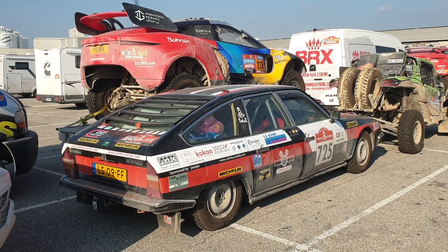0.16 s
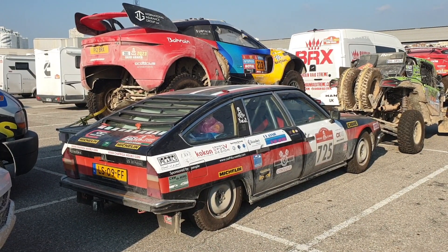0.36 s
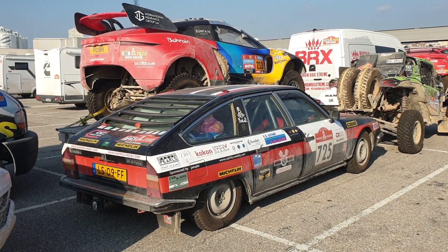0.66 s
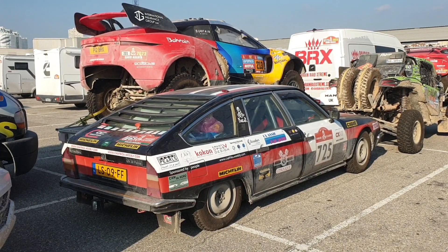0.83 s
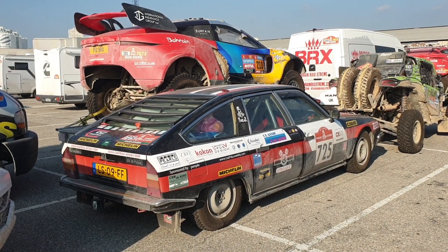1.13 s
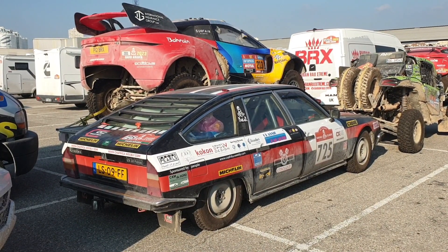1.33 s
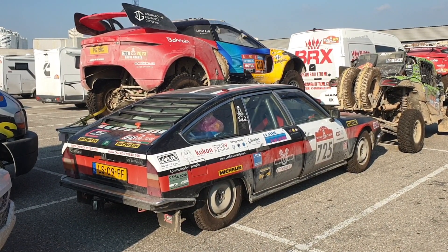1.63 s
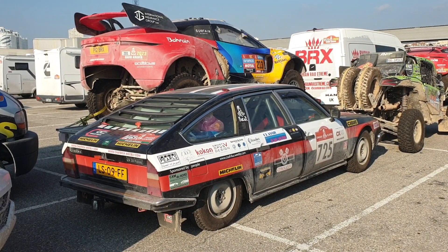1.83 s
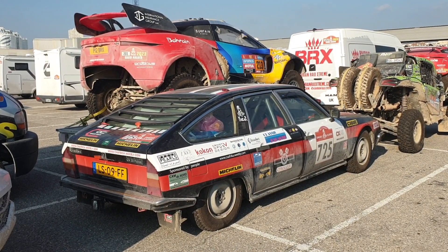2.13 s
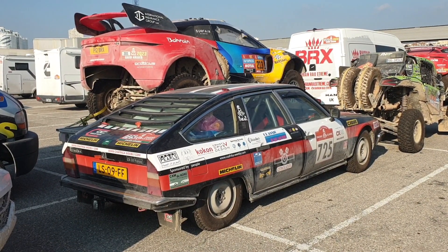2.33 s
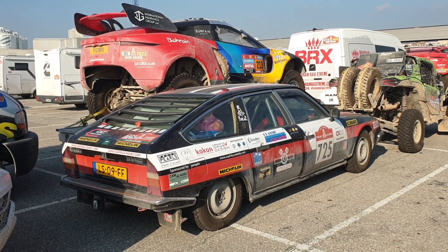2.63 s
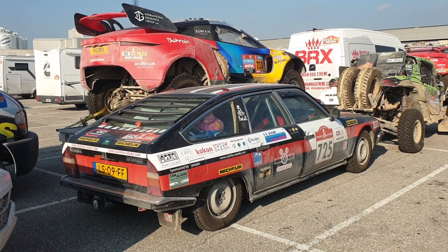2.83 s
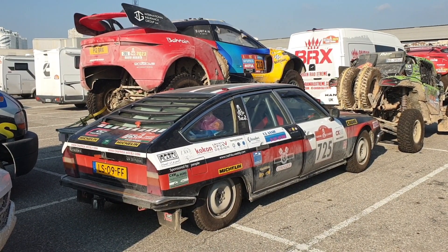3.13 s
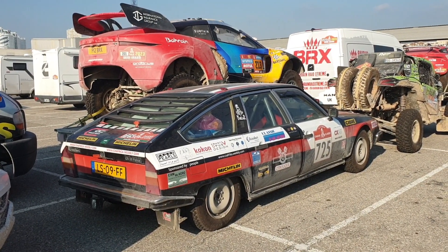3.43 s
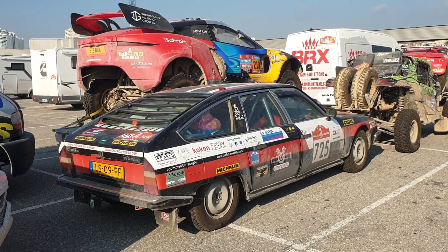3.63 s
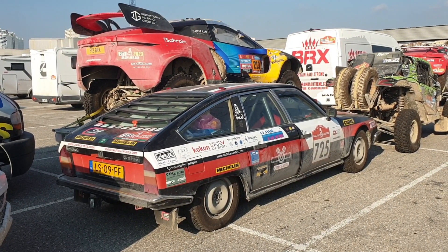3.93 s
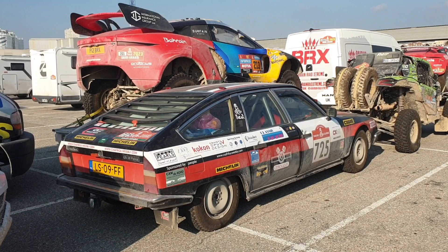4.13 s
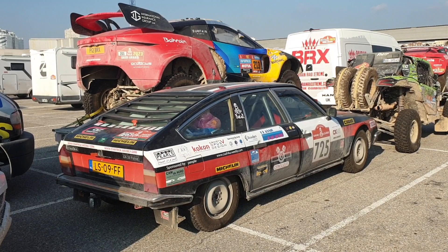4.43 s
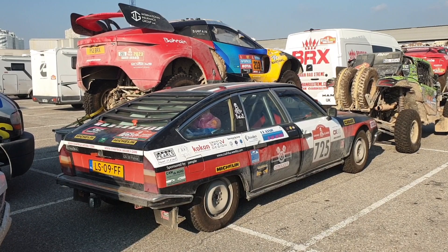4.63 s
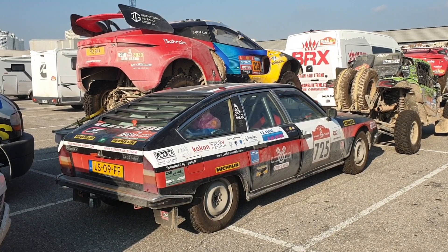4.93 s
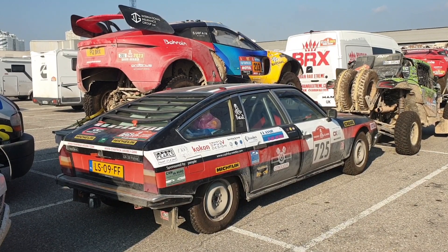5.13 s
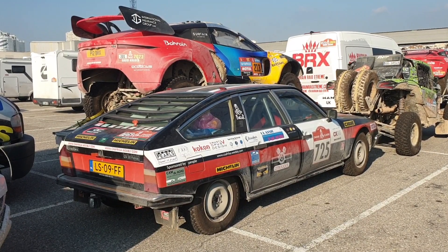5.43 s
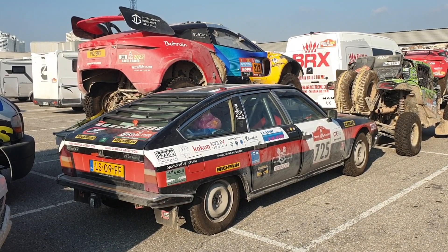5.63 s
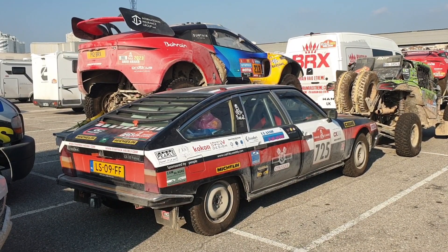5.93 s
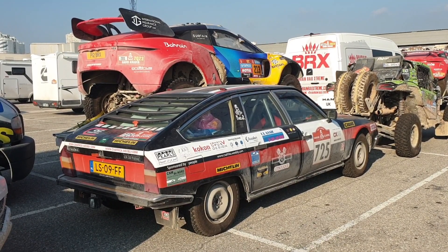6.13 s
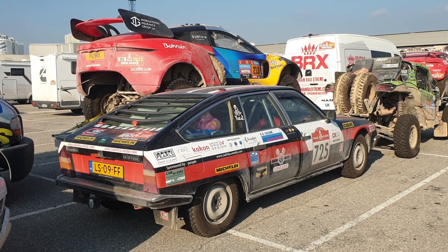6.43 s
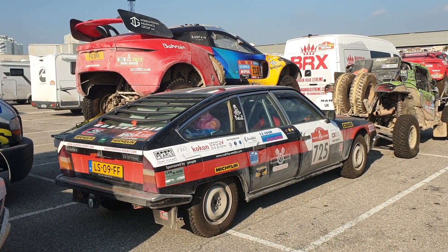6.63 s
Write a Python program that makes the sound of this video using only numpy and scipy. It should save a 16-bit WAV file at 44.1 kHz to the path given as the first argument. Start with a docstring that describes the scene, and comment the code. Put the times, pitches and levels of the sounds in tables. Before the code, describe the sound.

An old four-cylinder car idles unevenly close by with a boomy chug, is blipped once with rasp and pops, then settles lower in an open car park.

```python
"""An old four-cylinder rally car idles close by in an open car park, chugging: one cylinder hardly fires.
It first idles fast while a loose part clinks, then sags; a single blip adds rasp and pops, and it settles
as air whistles past the shut throttle. Near the end come squeaks, a steady hiss from the right and a knock.
Throughout, exhaust pulses ring pipe resonances, shaped noise bursts make the gas, impacts make the valve
clatter, and engine orders excite a housing as whine, over faint yard noise."""
import sys
import numpy as np
from scipy import signal
from scipy.fft import rfft, irfft, next_fast_len
from scipy.io import wavfile
from scipy.ndimage import uniform_filter1d

SR = 44100
rng = np.random.default_rng(int(sys.argv[2]) if len(sys.argv) > 2 else 0)


def master(y):
    """Save y as 16-bit WAV."""
    cut = np.clip(np.atleast_2d(y).T, -1, 1)
    pcm = np.round(cut * 32767)  # scale
    wavfile.write(sys.argv[1], SR, pcm.astype(np.int16))


N = 298998
TIME = np.arange(N) / SR

# yard background and low rumble spectra: pitch_hz, density_db
YARD_SPECTRUM = [(350, -3), (800, -11), (1500, -5.5), (2400, -10), (3500, -3.5), (6300, -22.5), (7700, -46),
                 (15500, -22)]
RUMBLE_SPECTRUM = [(24, -2), (40, -1.5), (90, -17), (400, -52.5), (2000, -88)]
RUMBLE_DB = -54.5
# late hiss spectrum: pitch_hz, density_db
HISS_SPECTRUM = [(700, 8), (1500, 6.5), (2400, -12), (3600, 2.5), (5000, 1.5), (6400, 1), (7100, -7),
                 (7700, -22), (10000, -15.5), (12500, -9.5), (15500, -17)]
HISS_START_S, HISS_ATTACK_S, HISS_BEFORE_PAN_DB = 5.985, 0.004, -57
HISS_FLUTTER_DB, HISS_FLUTTER_PER_S = 1.8, 14
TOP_HZ = 15750  # upper limit of the sound
# interchannel phase of the bass, positive where the left leads: pitch_hz, lead_rad
BASS_PHASE = [(30, -.24), (70, -.24), (130, -.33), (300, -.35)]

# engine speed: time_s, firing_rate_hz
ENGINE_SPEED = [(0.0, 77.75), (0.15, 74.88), (0.624, 77.01), (1.047, 75.17), (1.569, 76.16), (2.123, 66.78),
                (2.901, 64.05), (3.158, 66.22), (3.481, 79.49), (3.648, 80.09), (4.147, 66.95),
                (5.277, 61.01), (5.822, 62.87), (6.333, 59.87), (6.78, 61.45)]
# engine level, which peaks in the blip, falls away and grows near the end as the car sounds closer:
# time_s, above_idle_db
ENGINE_LEVEL = [(0, 1), (0.6, 2), (1, 3), (1.7, 1.0), (1.88, 1.9), (2.15, 1), (2.5, 2), (2.9, 0.8),
                (3.1, 2), (3.27, 4.5), (3.42, 4.5), (3.55, 2), (3.78, -3.5), (4.03, 0.5), (4.3, 1.2),
                (5.3, 1), (6, 4), (6.78, 4)]
CRANK_START, IDLE_HZ = 0.616, 65  # initial count of firings; reference firing rate
# cylinders in firing order: pulse_strength, lateness_firing_intervals, gas_db, spit_db
CYLINDERS = [(0.427, -0.098, -0.5, -7), (1.463, 0.061, 4.5, 6), (1.124, 0.035, 5.5, 6),
             (1.395, 0.035, 4, 3.5)]
# response of each layer to the engine: idle_level_db, engine_level_slope_db_per_db, speed_slope_db_per_hz
PULSE_LAW = (8.1, 0.84, 0.085)
STROKE_LAW = (-10.85, 0.48, 0.35)
GAS_LAW = (-56.5, 0.85, 0.36)
SHELL_LAW = (-50.5, .7, .5)
WHINE_LAW = (-53.5, .1, .36)

# dull knock resonances: pitch_hz, width_hz, level_db
KNOCK_MODES = [(135, 36, 3), (310, 44, 2), (500, 110, -12)]
KNOCK_S, KNOCK_DRIVE_DB = 6.0815, -10
# faint high squeaks: centre_s, level_db
SQUEAKS = [(5.675, -51), (5.71, -49), (5.77, -53)]
# clinks of a loose metal part, before panning: start_s, level_db
CLINKS = [(0.2151, -47), (0.3343, -44), (0.3742, -41), (0.4251, -46), (0.4396, -38), (0.4775, -35),
          (0.5299, -38.5), (0.5827, -49), (0.5952, -51), (0.6361, -39), (0.6875, -40), (0.7384, -41),
          (0.7518, -34.5), (0.8451, -38), (0.8571, -38), (0.8975, -42), (0.9499, -44), (1.0153, -32.5),
          (1.0686, -35), (1.1634, -41), (1.1759, -39), (1.2143, -41), (1.2806, -40), (1.3874, -36),
          (1.4388, -35), (1.4787, -42), (1.5835, -46), (1.5974, -37)]
# loose part resonances: pitch_hz, width_hz, level_db
LOOSE_PART_MODES = [(2730, 33, -9), (3080, 76, -3), (3450, 83, 3.5), (3780, 67, -5.5)]
# intake whistles past the shut throttle: pitch_hz, width_hz, level_db
WHISTLE_MODES = [(3090, 110, 0), (3700, 70, 1), (5030, 90, -4)]
THROTTLE_SHUT_S, WHISTLE_DB = 4.25, -61
# housing resonances that pick out the whine: pitch_hz, width_hz, level_db
HOUSING_MODES = [(958, 26, 0), (1058, 34, -4)]
# whine components: order_per_firing, level_db
WHINE_ORDERS = [(12, -2), (14, -4), (16, 0)]
# engine block resonances: pitch_hz, width_hz, level_db
BLOCK_MODES = [(1520, 40, 0), (1727, 35, -10), (1960, 80, -7), (2200, 22, -2), (2790, 90, -11),
               (3460, 130, -10), (5140, 60, -14), (6110, 220, -18)]
BLOCK_RE_CLATTER_DB = -2.5
# valve clatter spectrum: pitch_hz, density_db
VALVE_SPECTRUM = [(700, -6.5), (1000, -3), (1550, -2), (1800, -14), (2450, -12), (3300, -7), (4300, -10),
                  (6200, -19), (7000, -29.5), (7700, -54), (9500, -30), (12000, -29.5), (15500, -34.5)]
# treble layers: time_s, spit_db, clatter_db
TREBLE_LEVELS = [(0, -50.5, -51.5), (1.05, -56, -48.5), (1.55, -52, -51.5), (1.7, -58.5, -49),
                 (2.05, -56, -49.5), (2.2, -57.5, -54), (2.9, -60.5, -51.5), (3.1, -53, -51.5),
                 (3.27, -48, -51.5), (3.44, -51.5, -54), (3.8, -62, -53), (4.0, -53, -50.5),
                 (4.14, -61, -50), (4.22, -60, -56.5), (5.3, -59, -56), (5.8, -57.5, -52),
                 (6.78, -50, -51.5)]

# exhaust pops during the blip: start_s, level_db
POPS = [(3.302, -41), (3.369, -40), (3.475, -42), (3.524, -40), (3.574, -42), (3.631, -44)]
# exhaust pop spectrum: pitch_hz, density_db
POP_SPECTRUM = [(600, 2), (850, 4), (1200, -3), (1500, 1), (2300, -3), (3000, -2), (4500, -11), (6300, -14),
                (7700, -32), (15500, -29)]
# rasp that the blip adds to every firing: time_s, level_db
RASP_LEVEL = [(3.05, -72), (3.15, -53), (3.27, -50), (3.45, -46), (3.55, -47), (3.68, -53), (3.85, -70)]
# rasp spectrum: pitch_hz, density_db
RASP_SPECTRUM = [(750, 2), (1000, 0.5), (1250, -6.5), (1520, 7), (1750, -10), (1950, 6), (2400, -9.5),
                 (3000, 1), (4500, -14), (5300, -17.5), (6200, -9.5), (7500, -29.5), (15500, -39.5)]
# spitting gas spectrum: pitch_hz, density_db
SPIT_SPECTRUM = [(1500, -5), (2400, -3), (3000, 2.5), (3500, 2.5), (4300, -4.5), (5300, -7.5), (6300, -8),
                 (7000, -15), (7700, -37), (9500, -16.5), (11700, -10), (15500, -22.5)]
CRACKLE_DB = 3.2  # spread of the random gains within a jet
# rushing gas spectrum: pitch_hz, density_db
GAS_SPECTRUM = [(350, 1.5), (450, -14.5), (520, 8.5), (620, -17.5), (720, 5), (900, 1.5), (1150, -5),
                (1550, 0), (1900, -6), (2600, -19.5), (6000, -50.5)]
# silencer shell resonances: pitch_hz, width_hz, level_db
SHELL_MODES = [(583, 16, 0), (626, 20, -.5), (887, 70, -13)]
# exhaust pipe resonances, main boom first: pitch_hz, width_hz, level_db, polarity_sign
PIPE_MODES = [(71.4, 7.0, -5.7, -1), (50.5, 22.3, -17.7, 1), (115.0, 33.1, -16.9, 1),
              (121.4, 96.2, -13.0, -1), (142.0, 59.4, -19.1, 1), (177.9, 11.7, -29.4, 1),
              (197.0, 1.8, -37.6, 1), (215.5, 149.7, -26.5, 1), (250.6, 3.5, -36.0, 1),
              (259.9, 12.1, -29.0, 1), (297.3, 14.1, -25.4, -1), (322.3, 16.9, -27.7, 1),
              (391.0, 18.3, -47.8, 1), (458.3, 35.6, -35.1, 1)]
# upper pipe resonances, which bloom in the blip and thin out as the revs sag: time_s, level_db
UPPER_LEVEL = [(0, -1), (.3, 1), (1.7, .5), (1.81, -6), (2.15, -4), (2.4, -.5), (3.15, -1), (3.4, .5),
               (3.55, 4.5), (3.75, 6), (3.95, -2), (4.15, -4.5), (4.5, 0), (6.78, 0)]
UPPER_LOW_HZ, UPPER_HIGH_HZ = 280, 350
# stray puffs in the exhaust: centre_s, strength
STRAY_PUFFS = [(4.594, 2.3)]


def undb(db):
    """Logarithmic level: decibels become an amplitude ratio."""
    return 10 ** (np.asarray(db) / 20)


def unit(x):
    """Normalisation: the root mean square becomes 1."""
    return x / np.sqrt(np.mean(x ** 2))


def curves(table):
    """Linear interpolation: each column becomes straight lines in time."""
    time_s, *columns = np.transpose(table)
    return [np.interp(TIME, time_s, column) for column in columns]


def filtered(x, response):
    """Linear filtering: the spectrum is multiplied by a function of frequency."""
    size = next_fast_len(N + SR)
    hz = np.maximum(np.fft.rfftfreq(size, 1 / SR), 1)
    return irfft(rfft(x, size) * response(hz), size)[..., :N]


def colour(x, points):
    """Spectral shaping: follow the (pitch, dB) points, with a steep fall below the first."""
    hz, db = np.transpose(points)

    def response(f):
        return undb(np.interp(np.log(f), np.log(hz), db)) * np.minimum(f / hz[0], 1) ** 2

    return unit(filtered(x, response))


def ring(x, modes):
    """Resonance: one force drives damped modes side by side, each with an optional polarity."""
    def response(f):
        return sum(np.prod(sign) * undb(db) / (1 + 1j * (f / hz - hz / f) * hz / abs(width))
                   for hz, width, db, *sign in modes)

    return filtered(x, response)


def bump(t, width):
    """Gaussian pulse: pressure rises and falls smoothly about t = 0."""
    return np.exp(-.5 * (t / width) ** 2)


def scatter(firing, spread_db):
    """Random variation: each firing number draws its own gain."""
    return undb(spread_db * rng.standard_normal(N // 100))[firing]


def walk(rate):
    """Random modulation: levels drawn rate times a second, slewed, with rms 1."""
    hold = int(SR / rate)
    steps = np.repeat(rng.standard_normal(N // hold + 1), hold)
    return unit(uniform_filter1d(steps, hold)[:N])


def strikes(table, decay_s):
    """Exponential decay: the envelope jumps at each row and dies away."""
    return sum(undb(db) * (TIME >= s) * np.exp(-np.abs(TIME - s) / decay_s) for s, db in table)


def from_right(x, pan_db, count):
    """Interchannel delay: the left lags by count samples and is pan_db weaker."""
    left = undb(-pan_db / 2) * np.pad(x, (count, 0))[:N]
    return np.array([left, undb(pan_db / 2) * x])


def diffuse(pan_db, direct_db=0):
    """Partial coherence: two independent noises share a direct part that lags on the left."""
    direct = from_right(rng.standard_normal(N), pan_db=-1.5, count=6)
    noise = rng.standard_normal((2, N)) + undb(direct_db) * direct
    return unit(noise * undb(np.array([[-pan_db], [pan_db]]) / 2))


def car_park(x, t60_s, wet_db):
    """Reverberation: asphalt and parked vehicles scatter a decaying tail, different on each side."""
    t = np.arange(SR // 2) / SR
    tail = rng.standard_normal((2, len(t))) * np.exp(-np.log(1000) * t / t60_s)
    tail /= np.sqrt(np.sum(tail ** 2, axis=1, keepdims=True))
    return undb(wet_db) * signal.fftconvolve(x[None], tail, axes=1)[:, :N]


def yard():
    """Stationary noise: independent background on each side over a rumble common to both."""
    background = undb(-59.0) * colour(rng.standard_normal((2, N)), YARD_SPECTRUM)
    return background + undb(RUMBLE_DB) * colour(rng.standard_normal(N), RUMBLE_SPECTRUM)


def nearby_hiss(count=10):
    """Band-modulated noise: the hiss opens quickly and holds while each band flutters."""
    opening = np.clip((TIME - HISS_START_S) / HISS_ATTACK_S, 0, 1)
    edges = np.geomspace(1000, TOP_HZ, count)
    noise = rng.standard_normal(N)
    bands = 0
    for k in range(count):
        flutter = undb(HISS_FLUTTER_DB * walk(HISS_FLUTTER_PER_S))
        bands = bands + filtered(noise, lambda f: np.digitize(f, edges) == k) * flutter
    return undb(HISS_BEFORE_PAN_DB) * opening * colour(bands, HISS_SPECTRUM)


def knock():
    """Impulse response: one short pulse rings a few low, broad modes."""
    return undb(KNOCK_DRIVE_DB) * ring(bump(TIME - KNOCK_S, .0003), KNOCK_MODES)


def squeaks(hz, width_hz, length_s):
    """Narrow-band noise: a resonance applied twice gives faint, breathy squeaks."""
    swell = sum(undb(db) * bump(TIME - s, length_s) for s, db in SQUEAKS)
    mode = [(hz, width_hz, 0)]
    return swell * unit(ring(ring(diffuse(pan_db=1), mode), mode))


def rattle(contact_s, pan_db):
    """Modal impact: each clink of a loose part shaken at fast idle stirs its modes differently."""
    t = np.arange(SR // 20) / SR
    modes = sum(undb(db) * np.exp(-np.pi * width * t) * np.sin(2 * np.pi * hz * t)
                for hz, width, db in LOOSE_PART_MODES)
    out = np.zeros((2, N))
    for s, db in CLINKS:
        contact = rng.standard_normal((2, len(t))) * np.exp(-t / contact_s)
        clink = signal.fftconvolve(contact, modes[None], axes=1)[:, :len(t)]
        start = int(s * SR)
        out[:, start:start + len(t)] += undb(db) * clink / np.abs(clink).max(axis=1, keepdims=True)
    return out * undb(np.array([[-pan_db], [pan_db]]) / 2)


def whistle():
    """Flow noise through resonances: air whistles thinly past the shut throttle."""
    shut = np.clip((TIME - THROTTLE_SHUT_S) / .3, 0, 1)
    air = colour(diffuse(pan_db=3), [(2500, 0), (6000, 0), (7500, -25)])
    return undb(WHISTLE_DB) * shut * unit(ring(air, WHISTLE_MODES))


def whine(crank):
    """Order excitation: high multiples of the firing rate glide through a housing's resonances."""
    orders = sum(undb(db) * np.sin(2 * np.pi * order * crank) * undb(2 * walk(16))
                 for order, db in WHINE_ORDERS)
    return ring(orders, HOUSING_MODES)


def block():
    """Steady-state resonance: broadband noise keeps the engine block ringing under the valve gear."""
    noise = colour(diffuse(pan_db=2), [(1300, 0), (6500, 0), (7700, -25)])
    return undb(BLOCK_RE_CLATTER_DB) * unit(ring(noise, BLOCK_MODES))


def valves(crank, loose, count=96):
    """Periodic impacts: a run of forces repeats each camshaft turn, with a loose random part added."""
    tooth = np.floor(crank / 4 * count).astype(int)  # four firings make one camshaft turn
    force = rng.standard_normal((2, count))[:, tooth % count] + loose * diffuse(pan_db=2.0)
    return colour(np.diff(tooth, prepend=tooth[0]) * force, VALVE_SPECTRUM)


def drive(law, hz, engine_db):
    """Source scaling: a layer's level in dB is linear in engine level and firing rate."""
    idle_db, per_db, per_hz = law
    return idle_db + per_db * engine_db + per_hz * (hz - IDLE_HZ)


def bursts(crank, hz, cylinder_db, lead, decay_s, spread_db):
    """Valve blow-down: flow swells as each exhaust valve opens and then dies away."""
    firing = np.floor(crank + lead + 4).astype(int)
    age = (crank + lead) % 1 / hz  # seconds since the valve opened
    gain = undb(cylinder_db)[firing % 4] * scatter(firing, spread_db)
    return unit(gain * age * np.exp(-age / decay_s))


def pops(decay_s):
    """Transient noise: a few harder cracks of gas leave the tailpipe during the blip."""
    return strikes(POPS, decay_s) * colour(diffuse(pan_db=2.5), POP_SPECTRUM)


def rasp(crank, hz):
    """Pulsed turbulence: with the throttle open, every firing tears out as a hard burst."""
    cylinder_db = np.array(CYLINDERS)[:, 2]
    blasts = bursts(crank, hz, cylinder_db, lead=.15, decay_s=.002, spread_db=1.5)
    return undb(curves(RASP_LEVEL)[0]) * colour(blasts * diffuse(pan_db=1.5), RASP_SPECTRUM)


def spit(crank, hz):
    """Jet noise: short crackling bursts of gas, weakest from the feeble cylinder."""
    cylinder_db = np.array(CYLINDERS)[:, 3]
    jets = bursts(crank, hz, cylinder_db, lead=.26, decay_s=.0028, spread_db=1.3)
    crackle = scatter(np.floor(crank * 20).astype(int) % (N // 100), CRACKLE_DB)
    return colour(jets * crackle * diffuse(pan_db=5.0), SPIT_SPECTRUM)


def gas(crank, hz, steady, front_db):
    """Turbulent flow: noisy puffs leave the tailpipe, with a steep front at each firing."""
    cylinder_db = np.array(CYLINDERS)[:, 2]
    puffs = steady + bursts(crank, hz, cylinder_db, lead=0.24, decay_s=0.008, spread_db=2.5)
    firing = np.floor(crank).astype(int)
    onset = np.diff(firing, prepend=firing[0])
    fronts = onset * undb(cylinder_db)[firing % 4] * scatter(firing, 0.87)
    turbulence = unit(puffs * diffuse(pan_db=3.5, direct_db=7))
    return turbulence + undb(front_db) * from_right(unit(fronts), pan_db=1.5, count=6)


def stereo_bass(x):
    """Interchannel phase: bass arrives slightly out of step and its shorter waves scatter off vehicles."""
    hz, lead = np.transpose(BASS_PHASE)
    sides = np.array([[1], [-1]])
    direct = filtered(x, lambda f: np.exp(.5j * sides * np.interp(np.log(f), np.log(hz), lead)))
    short_waves = filtered(x, lambda f: np.minimum(f / 150, 1) ** 4)
    scattered = car_park(short_waves, t60_s=.15, wet_db=-15)[0]
    return direct * undb(-.35 * sides) + sides * scattered  # scattered part is opposite on each side


def exhaust(crank, hz, engine_db, pulse_db, stroke_db, pulse_s, spread_db, flutter_db):
    """Forced pipe resonance: three strong blow-downs and a feeble one ring it; pistons pump its boom."""
    strength, late, _, _ = np.transpose(CYLINDERS)
    firing = np.round(crank).astype(int)
    cylinder = firing % 4
    # pulses sharpen with speed and engine level, and vary by chance
    width = pulse_s * (hz / 66) ** -.93 * undb(-.14 * engine_db) * scatter(firing, .7)
    shape = bump((crank - firing - late[cylinder]) / hz, width) * pulse_s / width
    pulses = strength[cylinder] * scatter(firing, spread_db) * shape
    turbulence = undb(flutter_db) * colour(rng.standard_normal(N), [(130, 0), (1000, 0)])
    stray = sum(size * bump(TIME - s, pulse_s) for s, size in STRAY_PUFFS)
    push = (pulses + turbulence) * undb(pulse_db) + stray
    # the piston pushes just after the blow-down
    stroke = undb(stroke_db) * np.cos(2 * np.pi * (crank - 1 / 9))
    boom_hz, boom_width = PIPE_MODES[0][:2]
    upper = [mode for mode in PIPE_MODES if UPPER_LOW_HZ < mode[0] < UPPER_HIGH_HZ]
    others = [mode for mode in PIPE_MODES if not UPPER_LOW_HZ < mode[0] < UPPER_HIGH_HZ]
    upper_push = push * undb(curves(UPPER_LEVEL)[0])
    return ring(push, others) + ring(upper_push, upper) + ring(stroke, [(boom_hz, boom_width, 0)])


def scene():
    """Superposition: the close car is added to the yard background and the late hiss."""
    hz, engine_db = curves(ENGINE_SPEED)[0], curves(ENGINE_LEVEL)[0]
    spit_db, clatter_db = curves(TREBLE_LEVELS)
    crank = CRANK_START + np.cumsum(hz) / SR  # counts firings

    hiss = nearby_hiss()
    background = yard() + from_right(hiss, pan_db=27.5, count=6)
    background += car_park(hiss, t60_s=.44, wet_db=-18.0)

    car = rattle(contact_s=.0045, pan_db=3) + squeaks(hz=3230, width_hz=450, length_s=.012)
    car += whistle()
    whine_level = undb(drive(WHINE_LAW, hz, engine_db))
    car += from_right(whine_level * whine(crank), pan_db=2.5, count=6)
    car += undb(clatter_db) * (block() + valves(crank, loose=1.5))
    car += pops(decay_s=0.0067) + rasp(crank, hz) + undb(spit_db) * spit(crank, hz)

    flow = gas(crank, hz, steady=0.2, front_db=-9.5)
    car += undb(drive(GAS_LAW, hz, engine_db)) * colour(flow, GAS_SPECTRUM)
    # the puffs ring the silencer shell
    car += undb(drive(SHELL_LAW, hz, engine_db)) * unit(ring(flow, SHELL_MODES))

    pulse_db, stroke_db = drive(PULSE_LAW, hz, engine_db), drive(STROKE_LAW, hz, engine_db)
    boom = exhaust(crank, hz, engine_db, pulse_db, stroke_db,
                   pulse_s=0.00082, spread_db=0.45, flutter_db=-5)
    car += stereo_bass(boom + knock())
    return background + car


def record(dry):
    """Band limiting: the response falls to nothing over the last 100 Hz below the upper limit."""
    return filtered(dry, lambda f: np.clip((TOP_HZ - f) / 100, 0, 1))


dry = scene()
out = record(dry)
master(out)
```